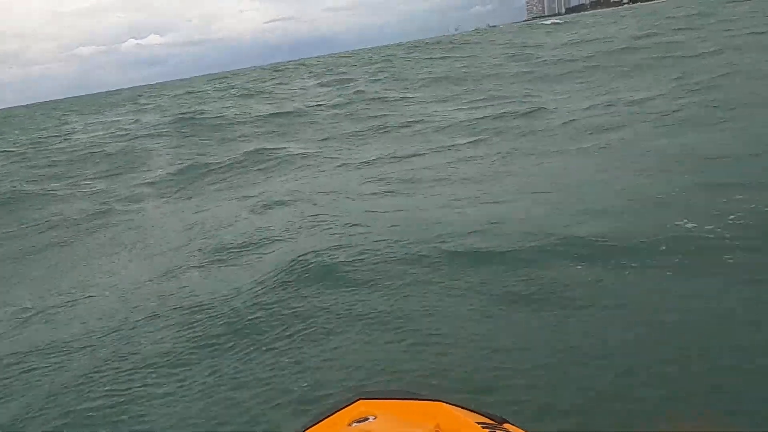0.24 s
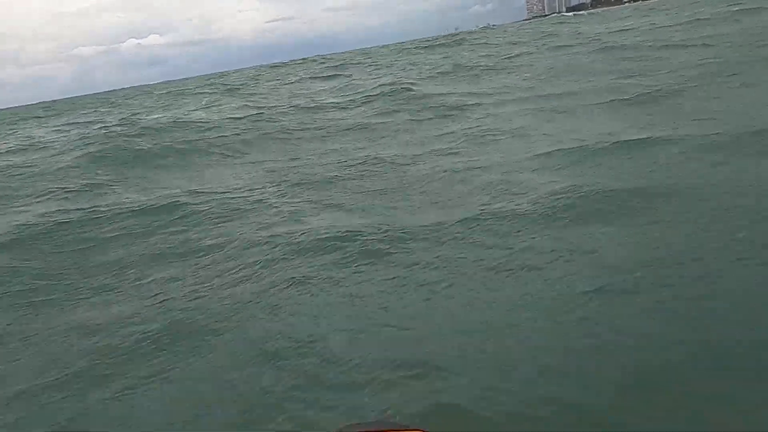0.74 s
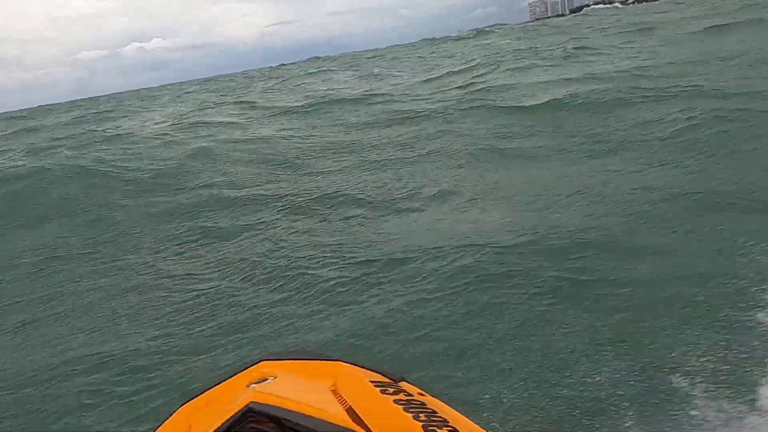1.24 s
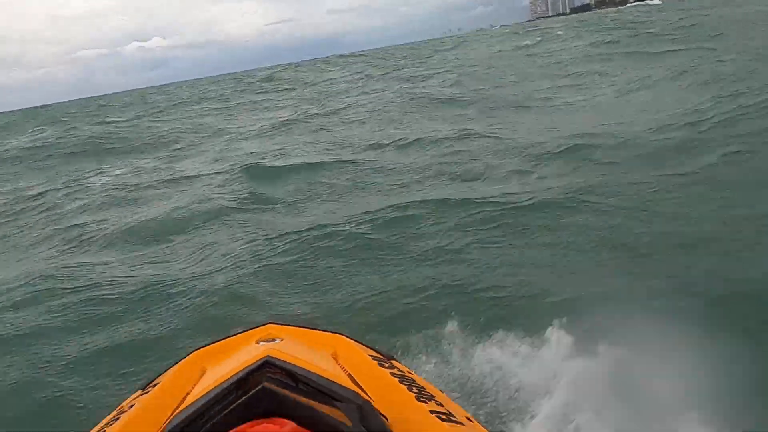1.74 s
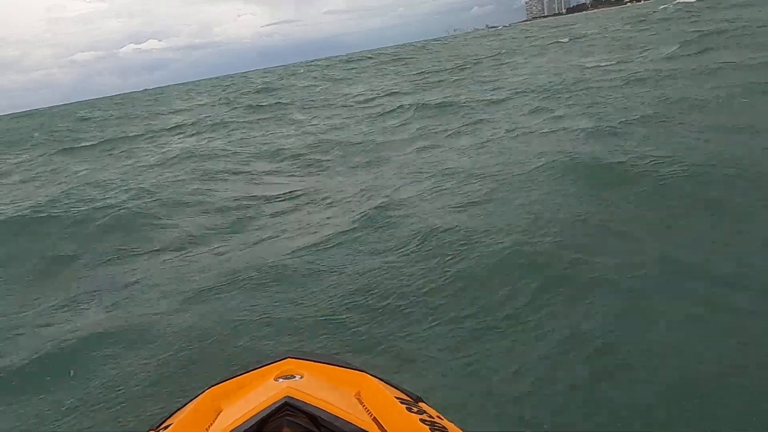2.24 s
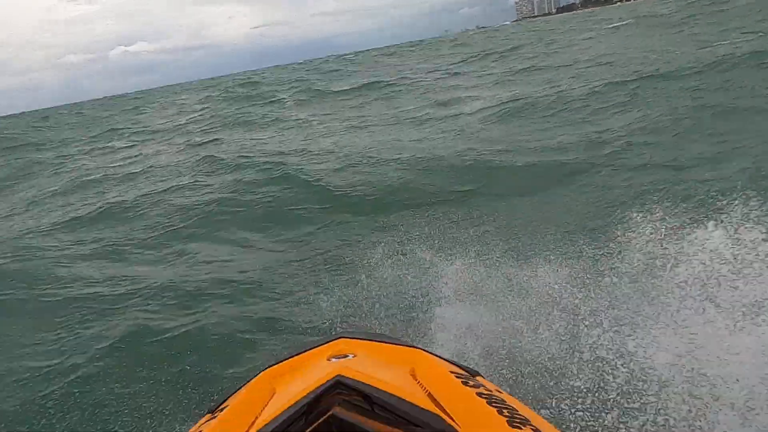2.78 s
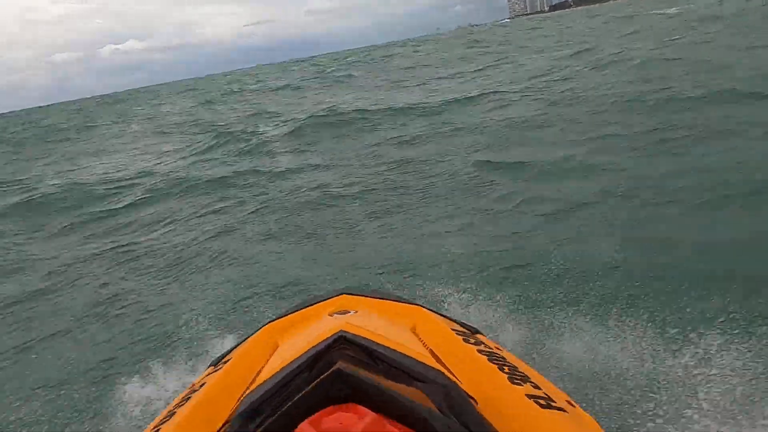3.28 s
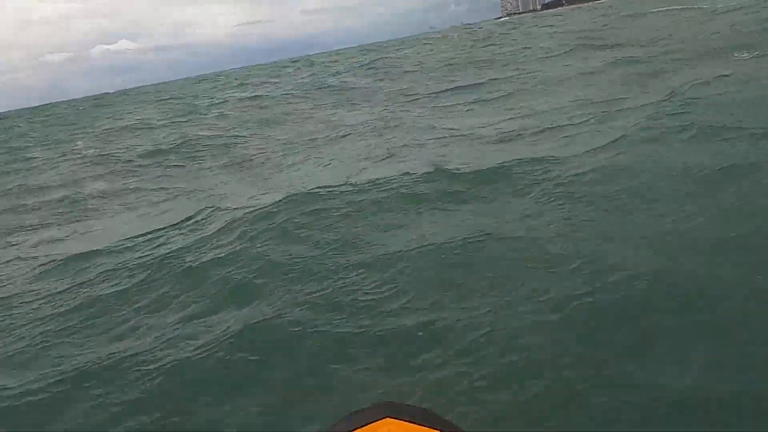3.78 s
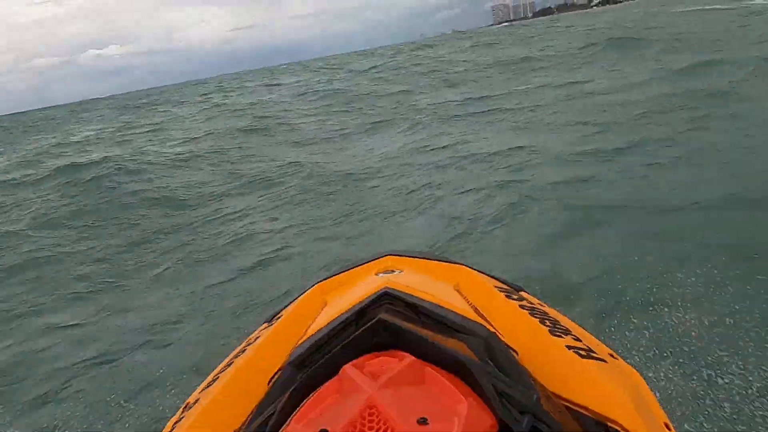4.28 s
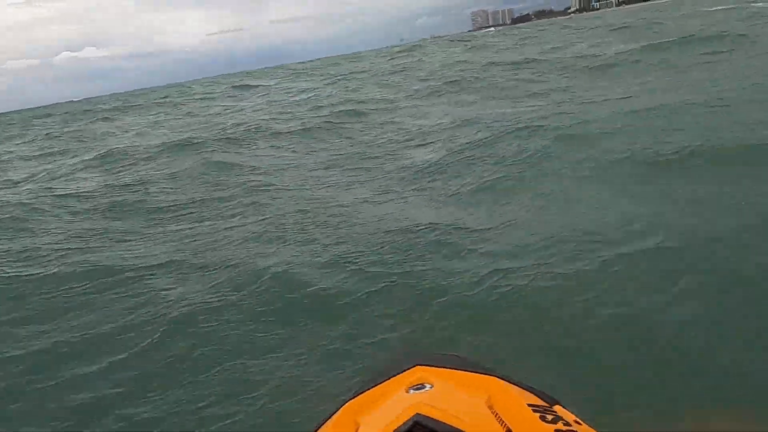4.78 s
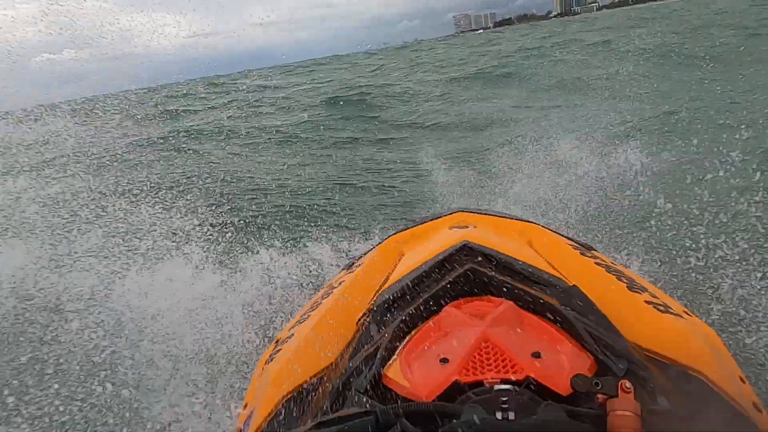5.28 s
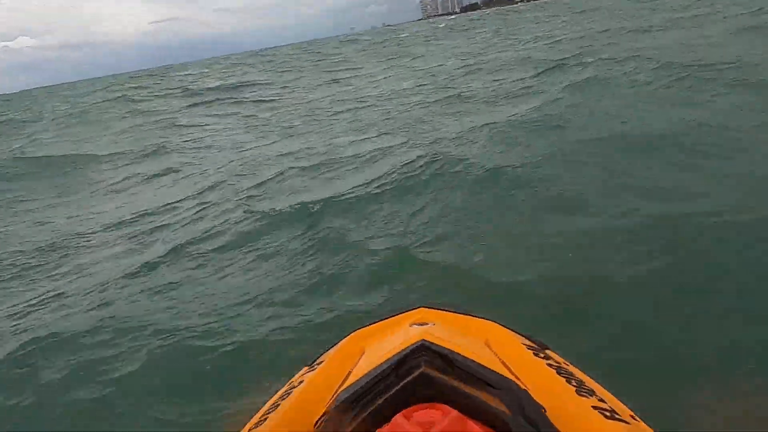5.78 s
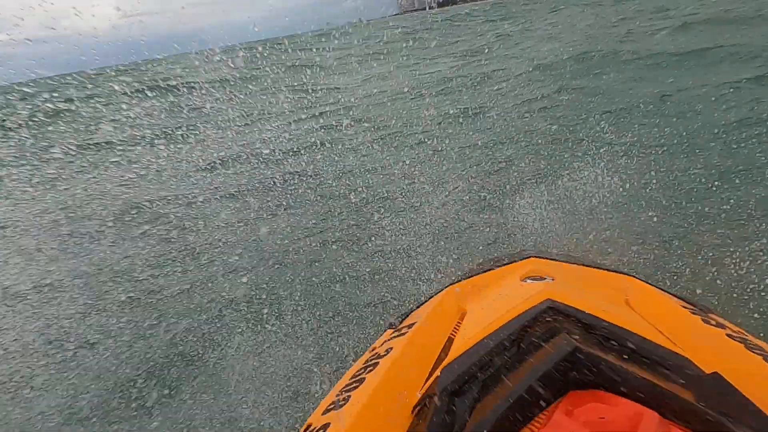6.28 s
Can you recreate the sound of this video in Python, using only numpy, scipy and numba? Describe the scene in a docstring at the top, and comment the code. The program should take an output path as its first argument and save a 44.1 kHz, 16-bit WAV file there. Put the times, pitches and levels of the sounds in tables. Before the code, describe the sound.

Wind buffets the microphone as a jet ski crosses choppy sea, with faint water hiss, hull slaps and bursts of crackling spray.

```python
"""A small jet boat crosses a choppy sea, heard by a shielded microphone on the rider.
From the start, turbulent wind buffets the port with a dull roar that brightens in gusts, jet wash and sea
hiss faintly through the port's resonance, and the engine drones through at times. From about 1.8 s the
hull slaps, air pockets plop and single drops tick. After 5 s water gurgles over the port, and spray
crackles on the housing, near 5.5 s and again at the end."""
import sys
import numpy as np
from scipy import signal
from scipy.fft import rfft, irfft
from scipy.io import wavfile
from scipy.ndimage import uniform_filter1d
from numba import njit

SR = 44100
rng = np.random.default_rng(int(sys.argv[2]) if len(sys.argv) > 2 else 0)


def bounce(signal):
    """Save signal as a 16-bit WAV file at the path given by the first command-line argument."""
    frames = np.transpose(np.atleast_2d(signal))
    limited = np.clip(frames, -1, 1)
    pcm = np.round(limited * 32767).astype(np.int16)
    wavfile.write(sys.argv[1], SR, pcm)


N = 287973

WIND_LULLS = [(2.0, .019, -9), (2.27, 0.018, -4.5), (2.59, .025, -0.5), (4.054, 0.012, -21),
              (4.45, 0.013, -4.5), (4.857, 0.02, -5.5), (5.24, 0.078, -7)]  # momentary drops of the wind: t/s, length/s, level change/dB
HULL_RESPONSE = [(60, 0), (500, 0), (1500, -40)]  # the hull passes no treble: f/Hz, gain/dB
IMPACT_BODY = [(500, -11.5), (900, 4), (1300, -1), (1700, -2), (2700, -2), (3700, -8), (4900, -15.5),
               (6400, -40), (7500, -30.5), (9000, -73)]  # spectrum of water striking the housing: f/Hz, level/dB
IMPACT_TREBLE = [(4500, -25.5), (6000, 7.5), (7500, -9), (10500, -8), (12500, -18), (14000, -42)]  # sizzle of that impact: f/Hz, level/dB


def undb(db):
    """Amplitude ratio of a level in dB."""
    return 10 ** (np.asarray(db) / 20)


def unit(x):
    """Normalisation to rms 1."""
    return x / np.sqrt(np.mean(x ** 2))


def curves(table):
    """Linear interpolation of each column over time, the first column."""
    times, *columns = np.transpose(table)
    return [np.interp(np.arange(N) / SR, times, column) for column in columns]


def bumps(table):
    """Sum of Gaussian changes of level, in dB."""
    t = np.arange(N) / SR
    return sum(db * np.exp(-((t - centre) / (length / 2)) ** 2) for centre, length, db in table)


def colour(x, spectrum):
    """Spectral shaping by a gain that follows (f/Hz, gain/dB) points."""
    hz, db = np.transpose(spectrum)
    f = np.maximum(np.fft.rfftfreq(len(x), 1 / SR), 1)
    gain = undb(np.interp(np.log(f), np.log(hz), db, left=-90, right=-120))
    return irfft(rfft(x) * gain, len(x))


@njit
def resonator(x, hz, width_hz):
    """Second-order resonance: a state-variable band-pass with gain 1 at its moving centre."""
    y, band_state, low_state = np.empty(len(x)), 0., 0.
    for i in range(len(x)):
        g, damping = np.tan(np.pi * hz[i] / SR), width_hz / hz[i]
        band = (band_state + g * (x[i] - low_state)) / (1 + g * (g + damping))
        band_state = 2 * band - band_state
        low_state += 2 * g * band
        y[i] = damping * band
    return y


def flicker(rate_hz):
    """Random modulation of rms 1: held values, smoothed twice."""
    hold = int(SR / rate_hz)
    held = np.repeat(rng.standard_normal(N // 50)[:N // hold + 1], hold)
    return unit(uniform_filter1d(uniform_filter1d(held, hold), hold)[:N])


def eddies(spectrum, flicker_db, rate_hz):
    """Coloured noise with independent amplitude modulation in each half-octave band."""
    coloured = rfft(colour(rng.standard_normal(N), spectrum))
    half_octaves = 2 * np.log2(np.maximum(np.fft.rfftfreq(N, 1 / SR), 1) / spectrum[0][0])
    bands = [np.clip(1 - abs(half_octaves - k), 0, 1) for k in range(8)]
    return unit(sum(irfft(coloured * band, N) * undb(flicker_db * flicker(rate_hz)) for band in bands))


def swells(table):
    """Noise excites a gliding resonance, swelling and fading once for each row."""
    out, lead = np.zeros(N + SR), 4000  # the lead lets the resonance settle
    noises = rng.standard_normal((len(table), SR))
    for (start, length, first_hz, last_hz, width_hz, db), noise in zip(table, noises):
        i, n = int(start * SR), int(length * SR)
        hz = np.interp(np.arange(-lead, n), [0, n], [first_hz, last_hz])
        band = resonator(noise[:lead + n], hz, 1.2 * width_hz)
        for _ in range(3):  # steep skirts
            band = resonator(band, hz, 2.2 * width_hz)
        out[i:i + n] += undb(db) * unit(band[lead:]) * np.sqrt(np.hanning(n))
    return out[:N]


def wind():
    """Turbulence: large eddies rumble, smaller ones roar, and gusts push a bright edge past the shield."""
    levels = [(0, -16, 0, -23), (.5, -17, 3, -23), (1.3, -17.5, 0.5, -20), (2.2, -16.5, 2.5, -20.5),
              (3.1, -17.5, 0, -20.5), (3.7, -18.5, -1.5, -17.5), (4.8, -18, 1.5, -19), (5.4, -19, 2, -15),
              (5.7, -19.5, 2, -12), (6.53, -18.5, 0.5, -11.5)]  # t/s, rumble level/dB, roar re rumble/dB, edge re rumble/dB
    gusts = [(0.0, 0.12, 6), (1.0, 0.062, 7), (2.05, 0.14, -0.5), (2.74, 0.11, 5.5), (3.27, 0.11, 6),
             (4.0, 0.11, 8.5), (4.25, 0.22, 2), (5.1, 0.2, 12.5), (6.06, .14, 5.5)]  # t/s, length/s, rise of the edge/dB
    smothers = [(5.49, 0.05, -11), (5.57, 0.08, -8.5), (6.5, 0.048, -3)]  # water covers the port: t/s, length/s, change of roar and edge/dB
    rumble_spectrum = [(15, -10), (32, -4), (65, -2), (110, -3.5), (160, -18), (220, -57.5)]  # f/Hz, level/dB
    roar_spectrum = [(100, -3.5), (150, 2), (240, -1), (460, -3.5), (560, -11), (700, -32.5), (900, -95.5)]  # f/Hz, level/dB
    edge_spectrum = [(450, -20.5), (600, 6), (800, -6.5), (1000, -17.5), (1400, -29), (2200, -48),
                     (3500, -84)]  # f/Hz, level/dB
    rumble_db, roar_db, edge_db = curves(levels)
    gust_db, smother_db = bumps(gusts), bumps(smothers)
    rumble = eddies(rumble_spectrum, flicker_db=0.59, rate_hz=18)
    rumble *= undb(0.12 * gust_db - 0.18 * smother_db)  # swells a little as the rest is smothered
    roar = undb(roar_db + 0.26 * gust_db + smother_db) * eddies(roar_spectrum, flicker_db=1, rate_hz=13)
    edge = undb(edge_db + gust_db + smother_db) * eddies(edge_spectrum, flicker_db=1.7, rate_hz=25)
    return (rumble + roar + edge) * undb(rumble_db + bumps(WIND_LULLS))


def wash():
    """Foam and jet radiate broadband hiss, from which the port's resonance lifts two bands."""
    main_levels = [(0, -47.5), (.17, -58), (.27, -49.5), (.79, -56), (.81, -49.5), (1.1, -51.5), (1.5, -49),
                   (1.78, -51), (1.86, -55.5), (2.3, -53.5), (2.42, -58), (2.47, -51), (2.64, -51),
                   (2.68, -59.5), (2.87, -57), (2.91, -49), (3.03, -49), (3.25, -57), (3.32, -55),
                   (3.44, -49), (3.51, -55), (3.56, -61), (3.9, -58.5), (4.0, -55), (4.1, -58.5),
                   (4.18, -52.5), (4.4, -49), (5.05, -53.5), (5.24, -64.5), (5.35, -50.5), (5.62, -59.5),
                   (5.95, -54.5), (6.2, -47.5), (6.53, -63.5)]  # up as the hull ploughs, down as it lifts clear: t/s, level/dB
    port_centres = [(0, 2807), (.85, 2895), (1.1, 3141), (1.4, 2968), (1.7, 3129), (3.9, 3069), (4.5, 3203),
                    (5.4, 3137), (6.53, 2948)]  # centre of the main band: t/s, f/Hz
    port_roll_off = [(10, 0), (5000, 0), (8000, -15), (20000, -40)]  # f/Hz, gain/dB
    bed_spectrum = [(700, -38), (950, -4.5), (1200, -1), (1560, -10.5), (1870, -5), (2150, -8),
                    (2600, -7.5), (3600, -23), (5000, -26.5), (6000, -32), (7500, -52.5)]  # broad hiss: f/Hz, level/dB
    top_spectrum = [(3500, -24), (3800, -5), (4300, 0.5), (4650, -2), (4950, -21), (5500, -28.5)]  # the port's upper band: f/Hz, level/dB
    fizz_spectrum = [(6000, -31.5), (7000, -4), (9000, 0), (11500, -1.5), (13000, -23)]  # faint treble of the foam: f/Hz, level/dB
    fizz_levels = [(0, -104), (.45, -101), (.8, -92), (1.4, -89), (2.05, -88), (2.3, -100), (3.2, -88),
                   (3.6, -104), (5.0, -102), (6.53, -102)]  # t/s, level/dB
    main_db, = curves(main_levels)
    port_hz, = curves(port_centres)
    fizz_db, = curves(fizz_levels)
    bed = undb(-26 + main_db / 2) * eddies(bed_spectrum, flicker_db=0.97, rate_hz=27)
    main = resonator(rng.standard_normal(N), port_hz, width_hz=720.)
    main = unit(resonator(main, port_hz, width_hz=800.))
    main = undb(main_db) * colour(main, port_roll_off)
    top_db = -67.5 + 1.3 * (main_db + 54)  # swings further than the main band
    top = undb(top_db) * unit(colour(rng.standard_normal(N), top_spectrum))
    fizz = undb(fizz_db + 4 * flicker(rate_hz=12)) * unit(colour(rng.standard_normal(N), fizz_spectrum))
    return undb(1.3 * flicker(rate_hz=40) + 0.41 * bumps(WIND_LULLS)) * (bed + main + top + fizz)


def engine_drone():
    """The engine note wavers as narrow-band noise, low-passed by transmission through the hull."""
    notes = [(0, .5, 215, 190, -19), (3.4, .65, 245, 215, -21), (4.2, .3, 150, 145, -21),
             (6.05, .45, 240, 255, -20)]  # t/s, length/s, first f/Hz, last f/Hz, level/dB
    width_hz = 45.
    return colour(swells([(*glide, width_hz, db) for *glide, db in notes]), HULL_RESPONSE)


def plops():
    """Bubble resonance: a drop closes a pocket of air, which rings as a damped, gliding sine."""
    bubbles = [(1.777, 1149, 1200, 0.0436, -31), (3.105, 1842, 1850, 0.0238, -28),
               (3.105, 1150, 1170, 0.0313, -31), (5.598, 1154, 1300, 0.1758, -29),
               (5.611, 1397, 1280, 0.0024, -27), (5.765, 2050, 2800, .2, -42)]  # t/s, first f/Hz, last f/Hz, time to fall 60 dB/s, level/dB
    out, t = np.zeros(N + 4096), np.arange(4096) / SR
    onset = 1 - np.exp(-(t / .0005) ** 2)
    for start, first_hz, last_hz, ring, db in bubbles:
        hz = last_hz + (first_hz - last_hz) * np.exp(-t / (ring / 4))
        i = int(start * SR)
        out[i:i + 4096] += undb(db - 60 * t / ring) * onset * np.sin(2 * np.pi * np.cumsum(hz) / SR)
    return out[:N]


def hull_slaps():
    """Impact of water on the hull: a burst dulled by the wind shield, over a low thump."""
    slaps = [(1.778, 0.018, -27), (2.64, .025, -24), (2.721, 0.02, -20.5), (2.745, 0.023, -25.5),
             (3.958, .035, -24), (3.999, 0.013, -26.5), (4.02, .022, -18), (5.03, .11, -18),
             (5.13, .06, -24.5), (5.441, 0.03, -19.5)]  # t/s, length/s, level before the shield/dB
    shield = [(200, -4.5), (400, 13.5), (800, -3), (1100, -13.5), (1600, -18.5), (2500, -48), (4000, -71)]  # response through the wind shield: f/Hz, gain/dB
    burst_hz, burst_width_hz = 711, 510.
    thump_hz, thump_width_hz = 242.3, 260.
    bursts = swells([(start, length, burst_hz, burst_hz, burst_width_hz, db)
                     for start, length, db in slaps])
    thumps = swells([(start, length, thump_hz, thump_hz, thump_width_hz, min(db + 12.5, -12.5))
                     for start, length, db in slaps])
    return colour(bursts, shield) + colour(thumps, HULL_RESPONSE)


def drops():
    """Impulse response: each drop excites a heavily damped knock, with a sharp tick on top."""
    impacts = [(1.957, -33, 1301, -18.5), (3.1048, -33.5, 2700, -30), (3.1221, -31, 2300, -11),
               (3.18, -36, 3000, -6.5), (5.036, -29, 1500, -30), (5.056, -28, 1500, -30),
               (5.063, -26, 1601, -30), (5.077, -31, 1898, -18.5), (5.089, -24, 2389, -16.5),
               (5.092, -16, 1546, -26.5), (5.102, -32, 2489, -12), (5.1135, -33, 1902, -11),
               (5.118, -27.5, 1500, -26), (5.128, -22.5, 1485, -17), (5.137, -31.5, 1496, -22.5),
               (5.149, -29, 1294, -25.5), (5.3832, -30.5, 3120, -4.5), (5.3931, -41.5, 3353, -5),
               (5.4164, -23.5, 1400, -9), (5.4199, -15, 3110, -26), (5.441, -15.5, 1411, -9.5),
               (5.4514, -11.5, 1440, -19), (5.463, -13, 2307, -4), (5.466, -6, 2058, -17.5),
               (5.522, -19.5, 1198, -22.5), (5.5275, -21, 2600, -9), (5.533, -28, 3000, -12),
               (5.558, -25.5, 2900, -19.5), (5.5685, -23, 3200, -16), (5.6055, -26, 3500, -12),
               (5.6122, -23, 2600, -22), (5.675, -36.5, 2520, -13), (5.701, -34.5, 1450, -16.5),
               (5.634, -40, 3000, -8), (5.7648, -22.5, 1720, -32.5), (6.34, -16.5, 1416, -30),
               (6.3655, -29, 2504, -10), (6.376, -28, 3400, -3.5), (6.384, -28.5, 1787, -2),
               (6.387, -29.5, 4500, 3.5), (6.3934, -29, 4300, -3), (6.413, -29.5, 2400, -6.5),
               (6.416, -11.5, 2592, -9.5), (6.4265, -21, 2593, -16), (6.441, -23.5, 1700, -21),
               (6.449, -26.5, 2000, -17.5), (6.477, -19.5, 1844, -20.5), (6.486, -17.5, 2760, -23),
               (6.492, -9.5, 2623, -17.5), (6.503, -9.5, 3190, -6.5), (6.519, -16, 2200, -25.5),
               (6.526, -17, 2401, -26)]  # t/s, knock peak level/dB, f/Hz, tick re knock/dB
    tick_spectrum = [(2000, -30.5), (3000, -3), (4600, -7), (6000, -19.5), (7000, -42)]  # bright part of a tick: f/Hz, level/dB
    decay_cycles, tick_decay_s = 0.87, 0.00072
    out, t = np.zeros(N + 2048), np.arange(-256, 1792) / SR
    age = np.maximum(t, 0)
    for start, db, hz, tick_db in impacts:
        knock = colour(np.sin(2 * np.pi * hz * age) * np.exp(-age * hz / decay_cycles), IMPACT_BODY)
        burst = rng.standard_normal(2048) * np.exp(-age / tick_decay_s) * (t >= 0)
        tick, sizzle = colour(burst, tick_spectrum), colour(burst, IMPACT_TREBLE)
        i = int(start * SR) - 256
        for part, part_db in (knock, 0), (tick, tick_db), (sizzle, tick_db - 24):
            out[i:i + 2048] += undb(db + part_db) * part / abs(part).max()
    return out[:N]


def gurgles():
    """Water sliding over the port excites brief, narrow resonances."""
    resonances = [(5.49, .028, 3000, 2900, 400, -38), (5.482, .032, 6100, 6000, 230, -54),
                  (5.508, .012, 4500, 5200, 230, -48), (5.516, .016, 900, 1100, 500, -31),
                  (5.528, .045, 4300, 4300, 400, -55), (5.526, .032, 1950, 1950, 110, -43),
                  (5.525, .11, 1100, 1000, 400, -41), (5.568, .035, 1950, 1950, 100, -44),
                  (5.585, .04, 1150, 1300, 250, -39), (6.352, .012, 1400, 1500, 250, -39),
                  (6.372, .008, 3200, 3300, 350, -32), (6.39, .006, 4500, 4800, 500, -38),
                  (6.401, .008, 4500, 4500, 230, -43), (6.428, .025, 3600, 3400, 230, -41),
                  (6.435, .012, 1200, 1300, 200, -31), (6.462, .011, 1800, 1950, 300, -30),
                  (6.48, .011, 1150, 1250, 150, -26), (6.497, .025, 6500, 6800, 230, -51),
                  (6.476, .022, 2700, 2900, 300, -30), (6.486, .026, 2600, 3200, 600, -23),
                  (6.506, .03, 2900, 2600, 200, -25), (6.506, .03, 2300, 2100, 200, -25),
                  (6.505, .03, 3600, 3400, 230, -33), (6.342, .07, 1000, 1100, 600, -33),
                  (6.422, .04, 1700, 1300, 1000, -32), (6.512, .03, 1300, 1100, 600, -31),
                  (5.058, .085, 1300, 1300, 800, -37), (6.465, .04, 1900, 2100, 500, -34)]  # t/s, length/s, first f/Hz, last f/Hz, width/Hz, level/dB
    return swells(resonances)


def spray():
    """Shot noise: sheets of droplets of uneven size spatter the housing at random instants."""
    sheets = [(5.464, 0.04419, 0.017, -18, -26.5), (5.525, 0.043, 0.015, -31, -32),
              (5.55, .05, 0.13, -51, -40), (6.37, 0.065, 0.083, -39.5, -44),
              (6.426, 0.02, .04, -36.5, -51.5), (6.497, 0.035, 0.06, -26, -40)]  # peak t/s, rise/s, fall/s, peak level/dB, treble re peak/dB
    droplets_per_s, span_db = 4000, 25  # a rise or a fall covers span_db
    t = np.arange(N) / SR
    chance, size = rng.random((2, N))
    droplets = (chance < droplets_per_s / SR) * undb(-2.5 * np.log(size)) * rng.standard_normal(N)
    body, treble = np.zeros(N), np.zeros(N)
    for peak, rise, fall, db, treble_db in sheets:
        envelope = undb(db - span_db * np.maximum((peak - t) / rise, (t - peak) / fall))
        body += envelope
        treble += envelope * undb(treble_db)
    return body * unit(colour(droplets, IMPACT_BODY)) + treble * unit(colour(droplets, IMPACT_TREBLE))


def scene():
    """Superposition of all sources at one microphone."""
    return (wind() + wash() + engine_drone() + plops() + hull_slaps() + drops() + gurgles() + spray())[None]


@njit
def compressor_gain(x, threshold, ratio, attack, release):
    """Compression: gain falls as the envelope exceeds threshold; attack and release are per sample."""
    gain, envelope = np.empty(len(x)), threshold
    for i in range(len(x)):
        envelope += (abs(x[i]) - envelope) * (attack if abs(x[i]) > envelope else release)
        gain[i] = min(1., threshold / envelope) ** (1 - 1 / ratio)
    return gain


def record(dry):
    """Look-ahead bass compression evens the buffeting; self-noise, soft clipping and a low-pass follow."""
    ceiling, cutoff_hz = .7, 14200
    dry = dry * signal.windows.tukey(N, .0008)  # a gentle start and stop
    bass = colour(dry[0], [(10, 0), (700, 0), (1100, -60)])
    gain = compressor_gain(bass, threshold=0.21212, ratio=1.767, attack=0.01, release=0.002)
    gain = uniform_filter1d(uniform_filter1d(gain, size=301, origin=-90), size=201)
    self_noise = undb(-107) * rng.standard_normal(dry.shape)
    even = undb(-1) * bass * gain + (dry - bass) + self_noise
    rounded = even / (1 + (even / ceiling) ** 8) ** (1 / 8)
    return signal.sosfilt(signal.ellip(8, .2, 70, cutoff_hz, fs=SR, output="sos"), rounded)


dry = scene()
out = record(dry)
bounce(out)
```